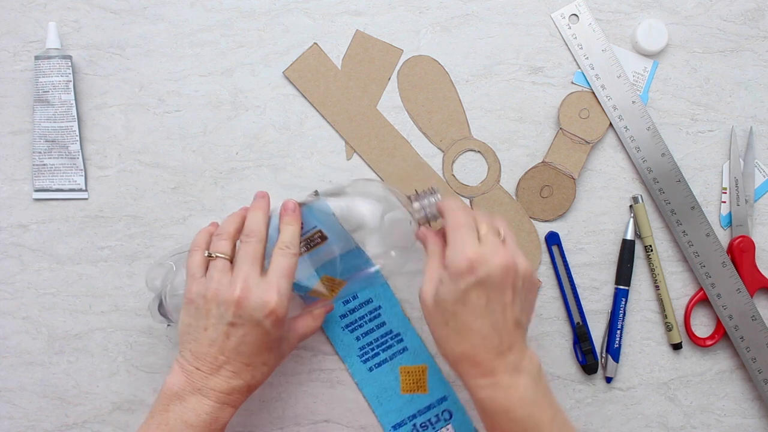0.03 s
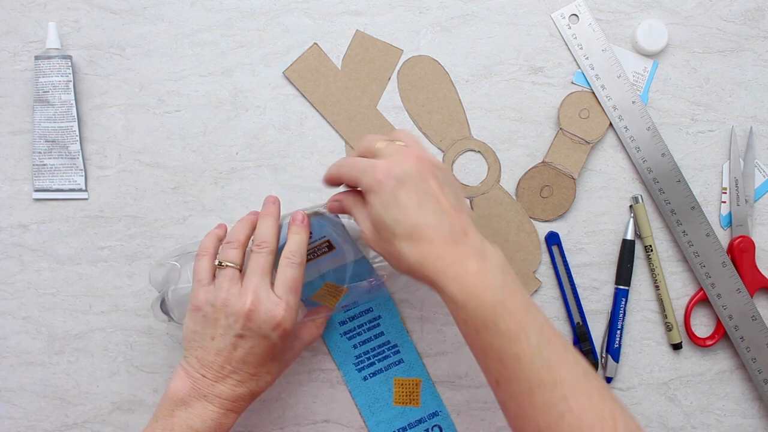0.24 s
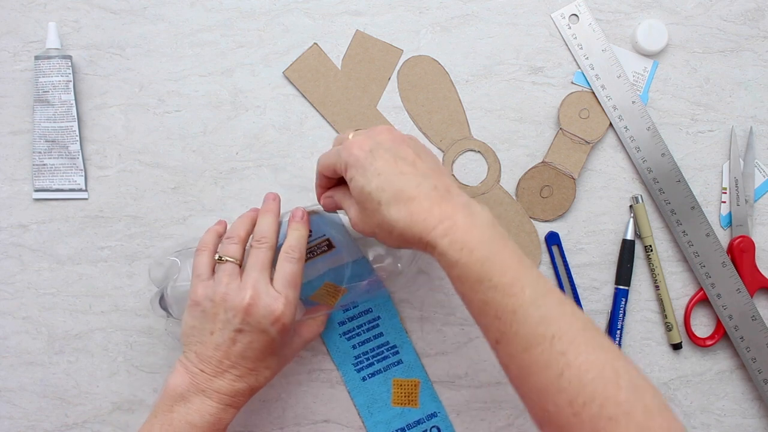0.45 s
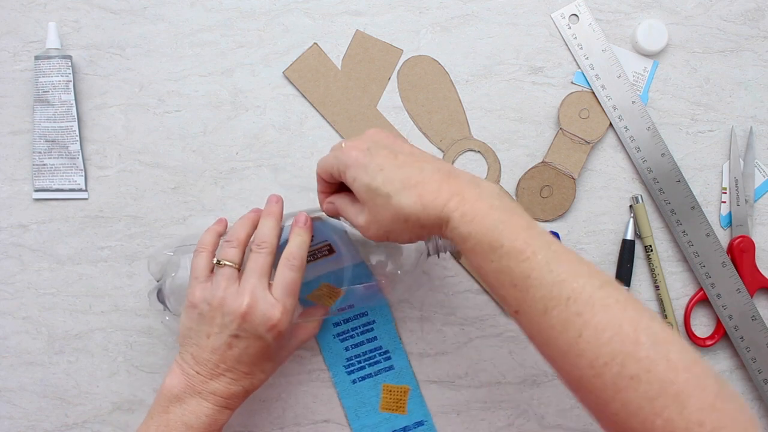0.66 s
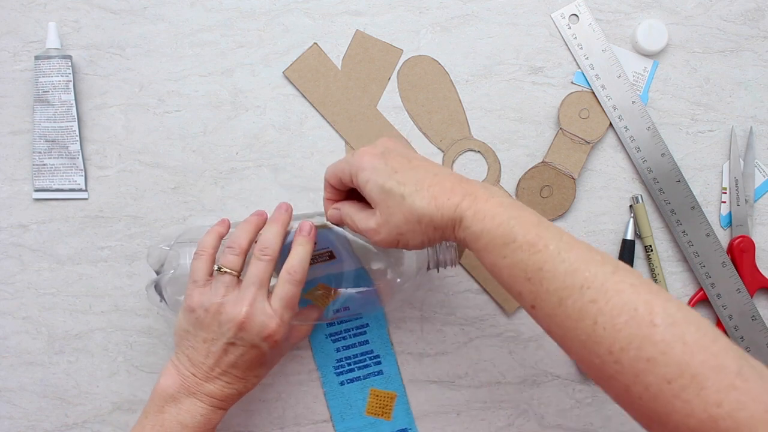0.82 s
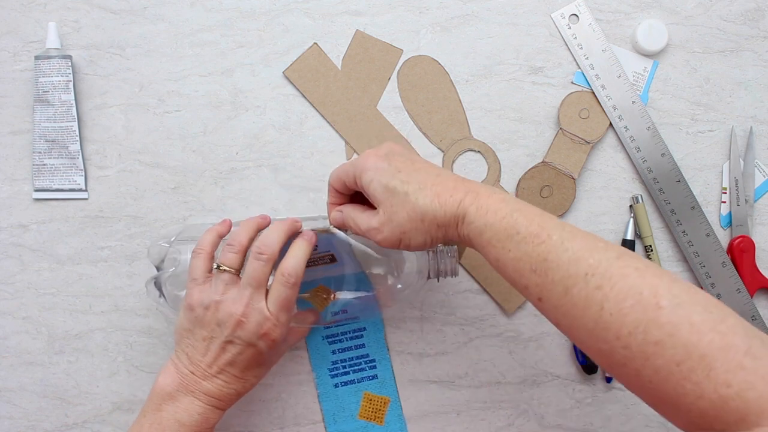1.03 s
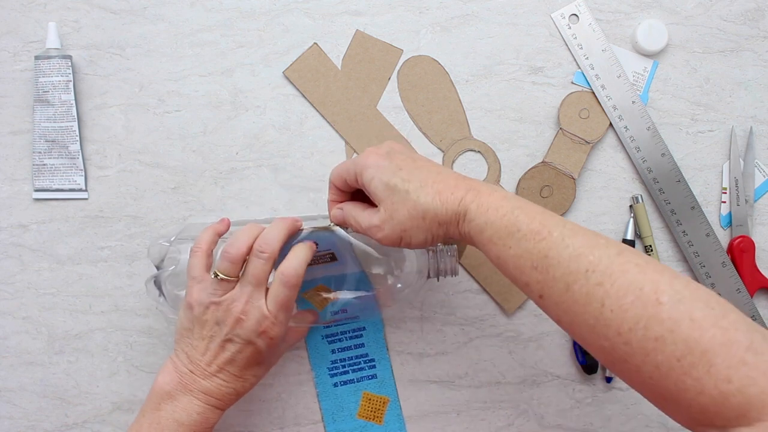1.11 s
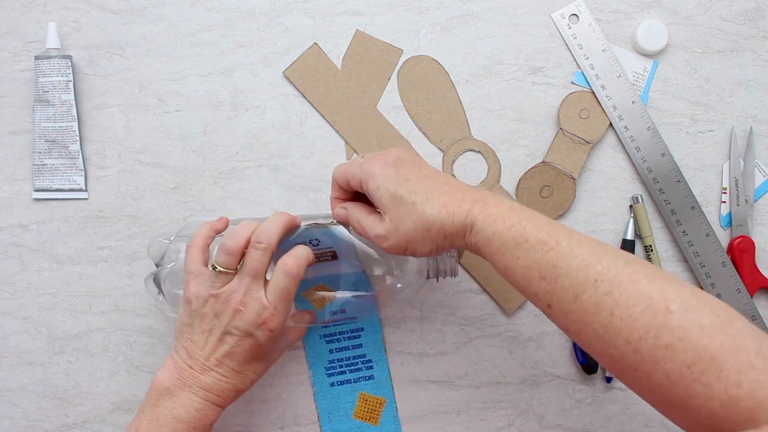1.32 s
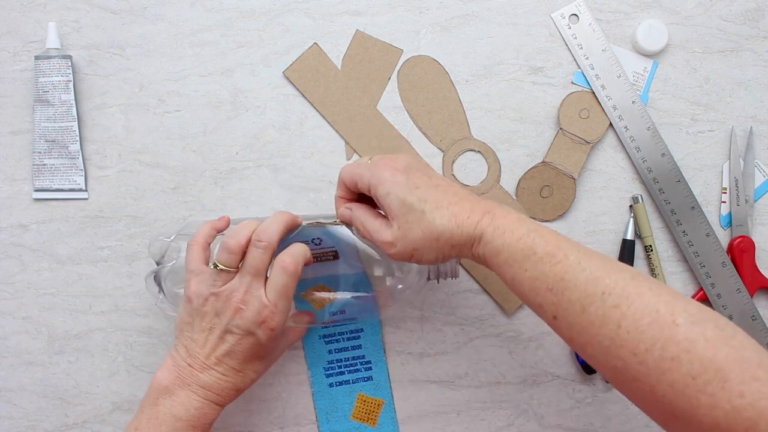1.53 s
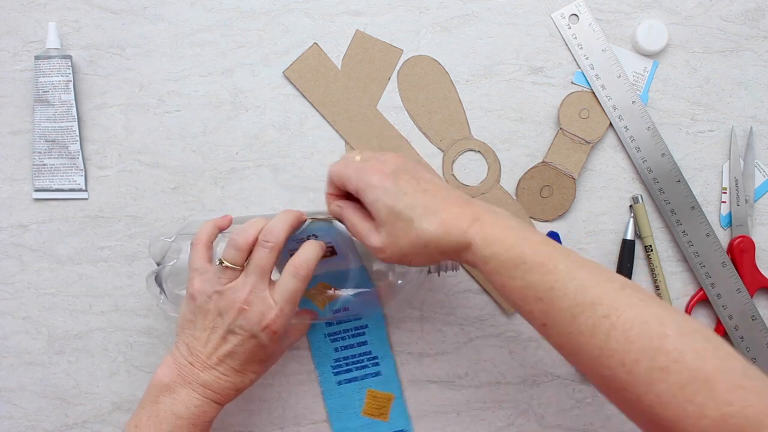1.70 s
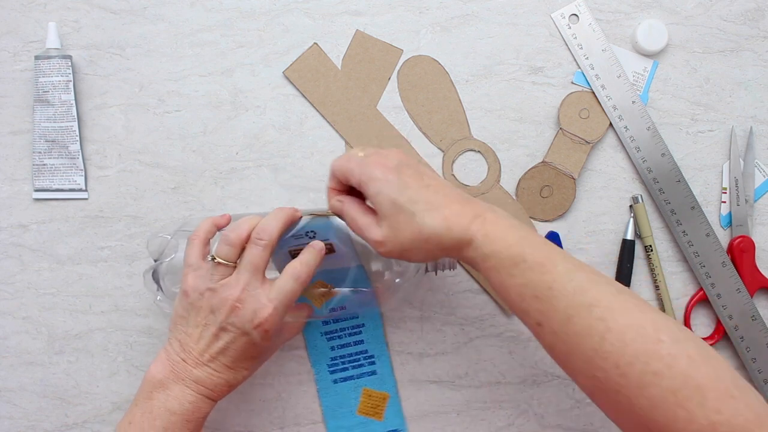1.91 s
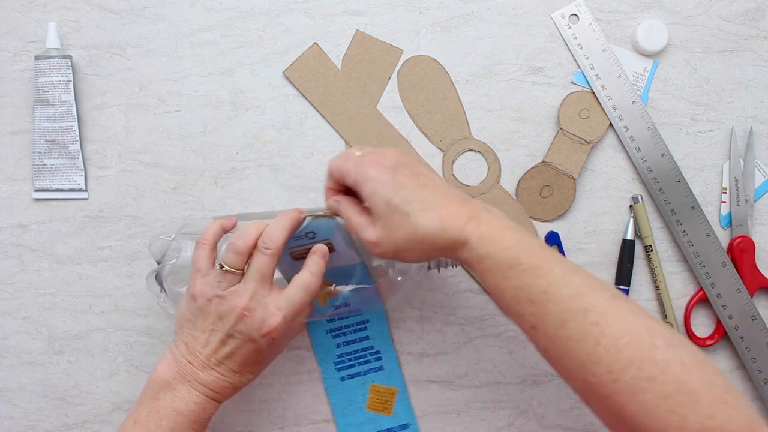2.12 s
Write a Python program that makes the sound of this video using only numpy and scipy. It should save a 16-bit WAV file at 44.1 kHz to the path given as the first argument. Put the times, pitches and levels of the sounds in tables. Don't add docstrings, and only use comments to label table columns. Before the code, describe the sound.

A thin plastic bottle crackles and snaps as hands squeeze it and push card through it

```python
import sys
import numpy as np
from scipy import signal
from scipy.fft import rfft, irfft
from scipy.io import wavfile
from scipy.ndimage import uniform_filter1d

SR = 44100
rng = np.random.default_rng(int(sys.argv[2]) if len(sys.argv) > 2 else 0)


def boost(x):
    u = np.asarray(x, float) / 20
    return 10 ** u


def store_pcm(level_fs):
    pcm = np.round(np.clip(level_fs, -1, 1) * 32767).astype(np.int16)
    wavfile.write(sys.argv[1], SR, np.atleast_2d(pcm).T)


N = 94815


def set_rms(x, db):
    return x * boost(db) / np.sqrt(np.mean(x ** 2))


def gain_curve(points, size):
    point_hz, point_db = np.array(points).T
    hz = np.maximum(np.arange(size // 2 + 1) * SR / size, 1)
    return boost(np.interp(np.log(hz), np.log(point_hz), point_db))


def colour(x, points, turn=1):
    return irfft(rfft(x) * turn * gain_curve(points, N), N)


def colour_burst(x, points):
    size = len(x)
    own = np.sqrt(uniform_filter1d(np.abs(rfft(x)) ** 2, size=size // 220))
    cepstrum = irfft(np.log(gain_curve(points, size) / own))
    cepstrum[1:size // 2] *= 2
    cepstrum[size // 2 + 1:] = 0
    return irfft(rfft(x) * np.exp(rfft(cepstrum)))


def ring(x, hz, t60):
    radius = 1000 ** (-1 / (t60 * SR))
    angle = 2 * np.pi * hz / SR
    return signal.lfilter([0, np.sin(angle)], [1, -2 * radius * np.cos(angle), radius * radius], x)


def band(x, hz, octaves):
    edges = np.clip(hz * 2 ** (np.array([-.5, .5]) * octaves), 20, SR * .48)
    return signal.sosfilt(signal.butter(2, edges, "bandpass", fs=SR, output="sos"), x)


def random_drift(size):
    held = np.repeat(rng.standard_normal(N // size + 1), size)
    return 1.3 * uniform_filter1d(uniform_filter1d(held, size), size)[:N]


def add(out, start, x, db):
    i = int(start * SR)
    out[i:i + len(x)] += (x * boost(db) / np.abs(x).max())[:N - i]


# time in seconds, level in dB, extra treble in dB.
CARD_STROKES = [(0, -51, 7), (.16, -49, 7), (.33, -51, 2), (.49, -63, 0), (.54, -48, -1), (.64, -51, -1),
                (.69, -45, 1), (.9, -47, 0), (.945, -43, 3), (1.06, -60, 0), (1.68, -64, 0), (1.72, -47, 4),
                (1.79, -41, -2), (1.845, -61, 0), (1.915, -60, 2), (1.97, -43, 4), (2.04, -57, 3),
                (2.15, -51, 5)]
# frequency in Hz, level in dB.
SCRAPE_SPECTRUM = [(120, -35), (330, -5), (650, -9), (1300, -16), (4900, -10), (6000, -20), (11000, -27),
                   (16000, -41)]
# frequency in Hz, bandwidth in Hz, level in dB.
SCRAPE_MODES = [(377, 81, 0), (1380, 35, -8), (2090, 44, -3), (2580, 46, -6), (3210, 98, -9),
                (3890, 25, -13), (4070, 120, -12), (4610, 110, -10)]


def scrape():
    grit_db, ring_db, flicker_db = 2.5, -5, 1.5
    unevenness = uniform_filter1d(rng.exponential(size=N), size=3)
    grains = rng.standard_normal(N) * boost(grit_db * unevenness)
    rings = sum(boost(db) * set_rms(ring(grains, hz, 2.2 / w), 0) for hz, w, db in SCRAPE_MODES)
    rubbing = set_rms(colour(grains, SCRAPE_SPECTRUM), 0)
    friction = set_rms(rubbing + set_rms(rings, ring_db), 0)
    time, stroke_db, hiss_db = np.array(CARD_STROKES).T
    t = np.arange(N) / SR
    treble = colour(friction, [(4500, -40), (6500, 0)])
    friction = friction + treble * (boost(np.interp(t, time, hiss_db)) - 1)
    return friction * boost(np.interp(t, time, stroke_db) + flicker_db * random_drift(size=700))


# frequency in Hz, level in dB.
AIR_SPECTRUM = [(45, -30), (75, -7), (140, -10), (300, -7), (660, -6), (1100, -18), (3000, -23),
                (16000, -40)]
# frequency in Hz, side against mid in dB.
AIR_SPREAD = [(100, -4), (250, -18), (1000, -10), (5000, -2), (9000, 0)]
# frequency in Hz, bandwidth in Hz, level in dB.
VENT_MODES = [(60, 10, -55), (109, 14, -52), (172, 20, -60)]


def air():
    air_db = -53
    mid = set_rms(colour(rng.standard_normal(N), AIR_SPECTRUM), air_db)
    side = set_rms(colour(rng.standard_normal(N), AIR_SPECTRUM), air_db)
    side = colour(side, AIR_SPREAD)
    for hz, width, db in VENT_MODES:
        mid = mid + set_rms(ring(rng.standard_normal(N), hz, 2.2 / width), db)
    return np.array([mid + side, mid - side])


def burst(length, size=8192):
    swell_s = .0008
    t = np.arange(size) / SR
    clicks = rng.standard_normal(size) * boost(2.5 * rng.exponential(size=size))
    return clicks * np.exp(-(t / length) ** 2.5) * (1 - np.exp(-t / swell_s))


# frequency in Hz, level in dB, t60 in seconds.
LOOSE_MODES = [(630, -8, 0.085), (937, 0, 0.024), (1170, -12, 0.08), (1577, -20, 0.13), (1793, -14, 0.1),
               (2046, -10, 0.06), (2331, -5, 0.04), (2638, -9, 0.055), (3214, -21, 0.06), (3666, -6, 0.039),
               (3962, -18, 0.12), (4177, -14, 0.1), (4570, -19, 0.065), (6040, -20, 0.048)]
# start in seconds, peak in dB, centre in Hz, burst length in seconds,
# width in octaves.
CREASE_TICKS = [(.0498, -39, 2050, .006, .1), (.15, -42, 3200, .04, .5), (.318, -47, 9000, .003, 1),
                (.5596, -18.5, 3500, .0055, 1.2), (.577, -26, 1400, .003, .8), (.5785, -24, 2900, .002, .6),
                (.5615, -29, 1000, .003, .8), (.5655, -29, 2100, .003, .8), (.569, -30, 2800, .006, .9),
                (.572, -30, 1000, .003, .7), (.574, -34, 3900, .004, .4), (.582, -32, 2500, .004, 1.4),
                (.588, -29, 2400, .006, 1), (.598, -33, 2200, .01, 1.4), (.678, -36, 1500, .004, 1.2),
                (.8101, -20, 1450, .002, 1.3), (.8105, -24, 2900, .002, 1.3), (.818, -34, 1350, .014, .3),
                (.916, -36, 2100, .008, .2), (.929, -30, 2200, .016, .1), (.933, -39, 1400, .015, .15),
                (.946, -37, 2600, .02, .12), (.953, -40, 1950, .012, .2), (1.099, -38, 2400, .007, 2.6),
                (1.2391, -24, 4600, .0035, 1.3), (1.530, -44, 4500, .004, 2.2),
                (1.596, -48, 15500, .005, .3), (1.7115, -42, 3500, .004, 1.1), (1.733, -41, 3600, .008, 1),
                (1.757, -35, 1800, .005, 2), (1.769, -35, 1700, .005, 1.4), (1.7764, -29, 2400, .007, 1.8),
                (1.791, -29, 780, .006, .4), (1.793, -24, 1700, .004, 1.9), (1.8, -34, 2200, .008, 1.6),
                (1.811, -39, 2000, .008, 1.6), (1.879, -44, 3500, .005, .9), (1.891, -48, 5000, .004, 2.4),
                (1.907, -44, 1800, .004, 1.2), (1.960, -38, 3500, .004, 1.2)]
# start in seconds, peak in dB, centre in Hz,
# burst length in seconds, width in octaves.
SNAP_SLIPS = [(.2248, -10, 5000, .001, .3), (.2266, -5, 3750, .0018, .5), (.227, -10, 2300, .003, .5),
              (.2298, -17, 2500, .002, .7), (.2333, -10, 2400, .0008, 1.6), (.2252, -9, 780, .003, .35),
              (.247, -24, 1900, .003, .5), (.262, -28, 950, .02, .5), (1.2965, -11, 1450, .0022, .4),
              (1.2968, -13, 3600, .002, .4), (1.2975, -12, 2700, .0035, .6), (1.3095, -23, 1800, .005, .7),
              (1.322, -26, 1300, .005, .6), (1.31, -30, 4800, .02, .6)]


def ticks():
    wall_gain = .012
    out = np.zeros(N)
    for start, db, hz, length, octaves in CREASE_TICKS + SNAP_SLIPS:
        wide = 2 ** (octaves / 2)
        low_skirt = [(hz / wide / 9, -30), (hz / wide / 1.4, -11), (hz / wide, -3)]
        high_skirt = [(hz * wide, -4), (hz * wide * 1.4, -18), (hz * wide * 4, -54)]
        click = colour_burst(burst(length, size=4096), low_skirt + [(hz, 0)] + high_skirt)
        wall = sum(ring(click, mode_hz, .3 * t60) for mode_hz, _, t60 in LOOSE_MODES)
        add(out, start, click + wall_gain * wall, db)
    return out


# frequency in Hz, level in dB, t60 in seconds.
TIGHT_MODES = [(404, 0, 0.027), (641, -19, 0.05), (1373, -20, 0.11), (1814, -18, 0.086), (2056, -16, 0.074),
               (2293, -19, 0.021), (2546, -9, 0.036), (2859, -24, 0.093), (3284, -20, 0.049),
               (3779, -27, 0.063), (969, -19, 0.08), (5286, -37, 0.12), (5604, -41, 0.11),
               (6218, -39, 0.057)]
# start in seconds, level in dB, burst length in seconds,
# wall ring in dB, factor by which the grip shortens the ring (0-1).
LOOSE_SNAP = (.2243, -3.5, .003, -9, .4)
TIGHT_SNAP = (1.2948, -8.5, .0055, -8, .55)
# frequency in Hz, level in dB per Hz.
LOOSE_CRACK = [(140, -28), (260, 0), (480, -15), (720, 4), (1400, -13), (2300, -1), (4900, 0), (5800, -12)]
TIGHT_CRACK = [(200, -26), (400, -2), (700, -8), (1600, 0), (2600, 0), (4100, -4), (4700, -13), (5600, -10)]
CRACK_TREBLE = [(8000, -21), (16000, -58)]


def snaps():
    out = np.zeros(N)
    grips = ((LOOSE_SNAP, LOOSE_MODES, LOOSE_CRACK), (TIGHT_SNAP, TIGHT_MODES, TIGHT_CRACK))
    for (start, db, length, wall_db, damp), modes, spectrum in grips:
        crack = colour_burst(burst(length), spectrum + CRACK_TREBLE)
        wall = 0
        for hz, mode_db, t60 in modes:
            wall = wall + boost(mode_db) * set_rms(ring(crack, hz, damp * t60), 0) * np.sqrt(t60)
        add(out, start, set_rms(wall, wall_db) + set_rms(crack, 0), db)
    return out


def puff(hz):
    push_s, t60 = .003, .034
    t = np.arange(4096) / SR
    push = np.sin(2 * np.pi * hz * t) * np.exp(-(t / push_s - 1) ** 2)
    return set_rms(ring(push, hz, t60), 0)


# start in seconds, peak in dB, air mode in Hz.
SOFT_BUMPS = [(.2245, -16, 270), (.246, -27, 295), (.27, -29, 280), (.265, -34, 512), (.295, -33, 300),
              (.318, -32, 272), (.44, -39, 264), (.563, -33, 300), (.579, -32, 330), (.592, -37, 290),
              (.678, -36, 444), (.836, -36, 330), (.85, -36, 400), (.875, -38, 420), (.92, -36, 374),
              (.936, -34, 400), (.955, -38, 330), (.968, -36, 400), (1.099, -31, 388), (1.128, -29, 272),
              (1.164, -37, 280), (1.2995, -17, 400), (1.312, -35, 520), (1.329, -27, 400),
              (1.338, -35, 500), (1.767, -34, 301), (1.781, -30, 336), (1.792, -30, 400), (1.802, -32, 350),
              (1.815, -38, 380), (1.96, -36, 315), (2.011, -36, 265)]


def bumps():
    neck_hz, neck_db = 640, -11
    out = np.zeros(N)
    for start, db, hz in SOFT_BUMPS:
        tone = puff(hz) + boost(-10) * puff(1.52 * hz) + boost(neck_db) * puff(neck_hz)
        add(out, start, tone, db + 1)
    return out


# frequency in Hz, t60 in seconds.
ROOM_DECAY = [(280, .45), (700, .45), (1600, .45), (3500, .29), (7000, .28), (13000, .14)]


def room(x):
    room_db, side_db, gap_s = -10.5, -8, .003
    early_db, early_t60 = 7, .05
    t = np.arange(SR // 2) / SR
    tails = 0
    for hz, t60 in ROOM_DECAY:
        tails = tails + band(rng.standard_normal((2, len(t))), hz, 1.2) * 1000 ** (-t / t60)
    early = 1 + boost(early_db) * 1000 ** (-t / early_t60)
    tails = tails * np.clip(t / gap_s - 1, 0, 1) * early
    balance = [(120, -24)] + [(hz, 10 * np.log10(t60)) for hz, t60 in ROOM_DECAY]
    tails = [colour_burst(tail, balance) for tail in tails]
    mid, side = (signal.fftconvolve(x, h / np.sqrt(np.sum(h ** 2)))[:N] for h in tails)
    side = side * boost(side_db)
    return boost(room_db) * np.array([mid + side, mid - side])


# frequency in Hz, side against mid in dB.
PORT_SIDE = [(100, -22), (400, -21), (2000, -7), (5000, -10), (9000, -2)]


def scene():
    bottle = snaps() + ticks() + bumps() + scrape()
    side = colour(bottle, PORT_SIDE, turn=1j)
    return np.array([bottle + side, bottle - side]) + room(bottle) + air()


def roll_off(x):
    return signal.sosfilt(signal.butter(12, 16670, fs=SR, output="sos"), x)


def record(dry):
    low_hz, balance_db = 56, 1.1
    high_pass = signal.butter(4, low_hz, "highpass", fs=SR, output="sos")
    heard = signal.sosfilt(high_pass, dry)
    sides = boost(np.array([[.5], [-.5]]) * balance_db)
    return roll_off(np.clip(heard * sides, -1, 1))


dry = scene()
out = record(dry)
store_pcm(out)
```